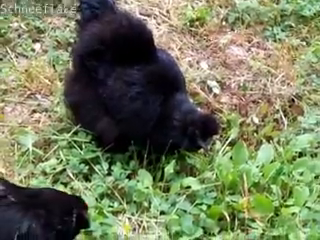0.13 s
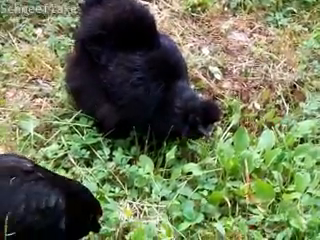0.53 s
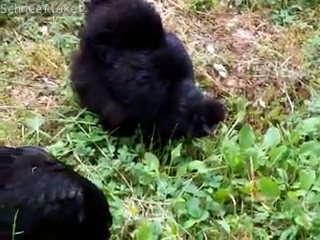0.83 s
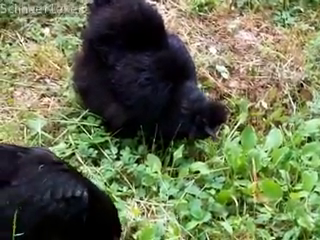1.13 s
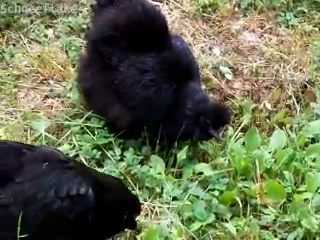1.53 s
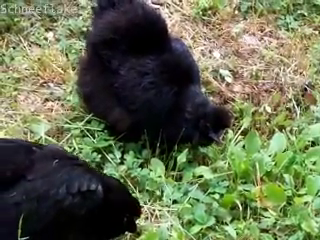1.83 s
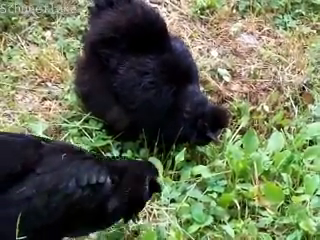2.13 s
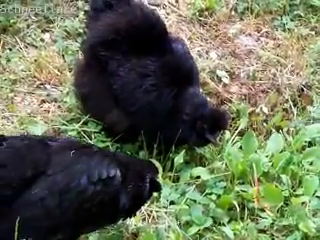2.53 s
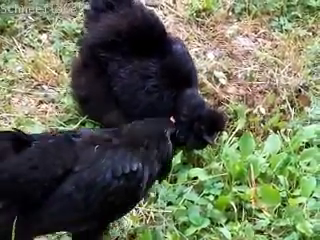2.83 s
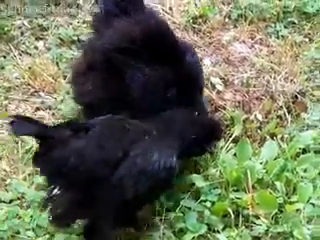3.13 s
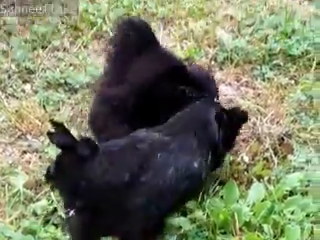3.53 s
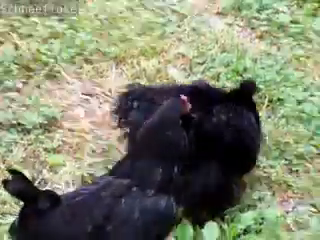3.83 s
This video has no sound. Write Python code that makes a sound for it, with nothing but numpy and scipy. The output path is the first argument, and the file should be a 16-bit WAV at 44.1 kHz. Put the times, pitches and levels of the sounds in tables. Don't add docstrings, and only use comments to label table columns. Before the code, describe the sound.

Hens on grass: short soft closed-beak notes, a small grumble, a soft coo, then a rattling growl breaking into a raspy scream and fluttering tail. Faint ticks and rustling follow over a dull outdoor wash, small mono pickup.

```python
import sys
import numpy as np
from scipy import signal
from scipy.fft import rfft, irfft
from scipy.io import wavfile
from scipy.ndimage import uniform_filter1d

SR = 44100
rng = np.random.default_rng(int(sys.argv[2]) if len(sys.argv) > 2 else 0)


def how_loud(loudness_db):
    steps = np.asarray(loudness_db, float) / 20
    return 10 ** steps


def dump_mix(stems):
    frames = np.atleast_2d(stems).T
    limited = np.clip(frames, -1, 1)
    pcm = np.round(limited * 32767).astype(np.int16)
    wavfile.write(sys.argv[1], SR, pcm)


N = 176400

# frequency in Hz, density in dB per Hz.
YARD_COLOUR = [(20, -16.5), (100, -5.5), (300, -4), (805, -0.5), (2730, -18.5), (3900, -28), (7800, -23.5)]

# start in seconds, length in seconds, level in dB, pitch in Hz.
MURMURS = [(-.02, 0.066, -47.5, 274), (0.092, 0.055, -53, 268), (0.157, 0.047, -54.5, 264.6),
           (0.197, 0.059, -53, 271), (0.338, 0.017, -40.5, 262), (0.373, 0.029, -42, 260.3),
           (0.538, 0.071, -58, 264.5), (.622, 0.036, -47.5, 268.3), (1.623, 0.025, -36, 272.7),
           (1.747, 0.066, -45.5, 264.4), (1.855, 0.081, -50, 264.3), (1.949, 0.072, -55.5, 256),
           (2.018, 0.082, -51.5, 273.8), (2.248, 0.098, -51, 280.5), (2.347, 0.082, -52, 272.3),
           (2.429, .17, -54.5, 277.5)]
# multiple of the pitch, level in dB.
MURMUR_PARTIALS = [(1, -7), (2, -8.5), (3, 0.5), (4, -13.5), (5, -24)]
# time in seconds, pitch in Hz, level in dB.
COO = [
    (2.652, 365, -47),
    (2.672, 284, -44),
    (2.725, 275, -49),
]
# multiple of the pitch, level in dB.
COO_PARTIALS = [(1, -11), (2, -17.5), (3, -21)]

# time in seconds, peak in dB, low part in dB.
STEM_TICKS = [(0.149, -57.5, 18), (0.398, -44, -0.5), (1.0008, -48.5, -5.5), (1.1808, -51.5, 9),
              (1.5593, -52, 4), (1.9064, -48, -12), (3.1018, -58, 26.5), (3.666, -55, -6),
              (3.696, -48.5, -0.5), (3.9307, -53, 4), (3.962, -52, 8)]
# time of the peak in seconds, level in dB, ring in Hz.
BEAK_TAPS = [(.15, -49, 1015), (0.149, -52.5, 2090), (.367, -50, 890), (3.101, -63, 1800),
             (3.119, -52, 1470), (0.453, -51, 1000), (0.453, -57.5, 2000), (3.118, -49, 2090),
             (3.127, -46.5, 369), (3.86, -46.5, 843), (3.874, -55, 412), (3.954, -46, 1220)]
# middle in seconds, length in seconds, level in dB.
RUSTLES = [
    (3.166, 0.34, -56.5),
    (3.662, 0.52, -64),
    (3.833, 0.11, -61),
    (3.969, 0.13, -50),
]
# frequency in Hz, density in dB per Hz.
LEAF_COLOUR = [(300, -12.5), (1170, -4.5), (3400, -22), (7800, -16)]

# time in seconds, pitch in Hz, level in dB.
SPRAY = [(1.799, 1900, -68.5), (1.895, 1858, -74.5)]
# time in seconds, pitch in Hz, level in dB.
GRUMBLE_HIGH = [(1.815, 891, -45), (1.86, 912, -47.5), (1.888, 878, -46.5), (1.905, 880, -59)]
# time in seconds, pitch in Hz, level in dB.
GRUMBLE_LOW = [(1.815, 712, -45.5), (1.829, 763, -54), (1.915, 719, -59)]
# time in seconds, pitch in Hz, level in dB.
GRUMBLE_TOP = [(1.815, 1110, -54.5), (1.895, 1060, -59)]
# time in seconds, pitch in Hz, level in dB.
ROLL = [
    (2.733, 941, -47.5),
    (2.83, 952, -40.5),
    (2.915, 940, -46.5),
]
# time in seconds, pitch in Hz, level in dB.
ROLL_TOP = [(2.741, 1994, -69.5), (2.85, 1905, -64.5), (2.905, 1810, -61)]
# time in seconds, pitch in Hz, level in dB.
GROWL_HIGH = [(2.915, 937, -41), (3.02, 890, -41.5), (3.05, 944, -39), (3.18, 945, -41.5)]
# time in seconds, pitch in Hz, level in dB.
GROWL_LOW = [(2.912, 775.5, -39.5), (2.958, 688.6, -43.5), (3.086, 768.5, -40), (3.16, 737, -42.5),
             (3.218, 765, -35.5)]
# time in seconds, pitch in Hz, level in dB.
GROWL_UNDER = [(2.93, 470, -64), (3.169, 430, -60)]
# time in seconds, pitch in Hz, level in dB.
SCREAM = [(3.178, 973, -41), (3.198, 986.6, -20.5), (3.207, 983, -50), (3.22, 1045, -22),
          (3.229, 1165, -31.5), (3.243, 1146, -32), (3.27, 1135, -33), (3.284, 1049, -26),
          (3.305, 912, -33)]
# time in seconds, pitch in Hz, level in dB.
SCREAM_SHRIEK = [(3.185, 1520, -34), (3.194, 1650, -28), (3.198, 2236, -37.5), (3.209, 2910, -35)]
# time in seconds, pitch in Hz, level in dB.
RASP_LOW = [(3.288, 779, -29), (3.305, 770, -26), (3.32, 751, -30.5), (3.338, 774, -26.5), (3.35, 755, -46)]
# time in seconds, pitch in Hz, level in dB.
RASP_MID = [(3.308, 1142, -41), (3.321, 1260, -28), (3.335, 1240, -36)]
# time in seconds, pitch in Hz, level in dB.
RASP_HIGH = [(3.286, 1487, -36.5), (3.291, 1650, -29), (3.346, 1562, -33)]
# time in seconds, pitch in Hz, level in dB.
RASP_RING = [(3.283, 3337, -54), (3.305, 3643, -50), (3.345, 3475, -62)]
# time in seconds, pitch in Hz, level in dB.
RASP_HISS = [(3.278, 5220, -63.5), (3.308, 4900, -61.5), (3.345, 5030, -58)]
# time in seconds, pitch in Hz, level in dB.
CRY_HIGH = [(3.316, 1121, -50), (3.348, 1384, -27), (3.357, 1325, -44.5), (3.372, 1351, -25.5),
            (3.4, 1200, -47)]
# time in seconds, pitch in Hz, level in dB.
CRY_LOW = [(3.36, 1070, -28), (3.372, 1067, -47), (3.381, 986, -21), (3.401, 910, -60.5)]
# time in seconds, pitch in Hz, level in dB.
CRY_END = [(3.386, 827, -46), (3.398, 740, -37.5), (3.406, 750, -60)]
# time in seconds, pitch in Hz, level in dB.
TAIL_HIGH = [(3.405, 1252, -38), (3.443, 1278, -47), (3.485, 1366, -29.5)]
# time in seconds, pitch in Hz, level in dB.
TAIL_MID = [(3.419, 1003, -42.5), (3.448, 1041, -36.5), (3.476, 1032, -56), (3.494, 1021, -32.5),
            (3.519, 1090, -48.5), (3.565, 1030, -49)]
# time in seconds, pitch in Hz, level in dB.
TAIL_LOW = [(3.482, 799, -44), (3.494, 804, -40.5), (3.618, 791, -48)]
# time in seconds, pitch in Hz, level in dB.
TAIL_TOP = [(3.39, 2076, -55), (3.431, 1874, -62), (3.528, 1778, -72)]
# time in seconds, pitch in Hz, level in dB.
TAIL_UNDER = [(3.53, 542, -59), (3.616, 482, -51)]
# time in seconds, pitch in Hz, level in dB.
BEAK_RING = [(3.41, 3780, -78), (3.5, 3730, -65), (3.54, 3540, -85)]
# frequency in Hz, gain in dB.
THROAT = [(1500, -24), (1900, -20.5), (2280, 0.5), (2650, -49), (3450, -14), (3800, -33), (4600, -20),
          (5500, -27.5)]
# middle in seconds, size in dB.
GRUMBLE_THROBS = [(1.824, -4.5), (1.838, 2.5), (1.854, -5), (1.867, -7), (1.877, -8), (1.889, 2),
                  (1.902, -6), (1.915, -8)]
# middle in seconds, size in
# dB.
LONG_CALL_THROBS = [(2.740, 1), (2.754, -2), (2.771, -2), (2.782, 7.5), (2.797, -1), (2.815, -2.5),
                    (2.828, 1.5), (2.845, 1.5), (2.859, 4.5), (2.875, -0.5), (2.890, 1.5), (2.906, 6.5),
                    (2.922, 1.5), (2.94, 1), (2.959, -4.5), (2.973, 0.5), (2.986, 0), (3.008, -0.5),
                    (3.024, -5.5), (3.039, -2), (3.052, -4), (3.067, -1.5), (3.081, -2.5), (3.098, -1),
                    (3.115, 4.5), (3.128, 0.5), (3.147, 2.5), (3.164, 3), (3.178, 2.5),
                    (3.197, -1.5), (3.219, 1), (3.239, 1), (3.256, 0.5), (3.268, 4), (3.285, 1.5),
                 (3.304, 0.5), (3.320, -2), (3.337, 0), (3.349, -1), (3.369, 0), (3.385, -2.5),
                 (3.398, -4.5), (3.414, 1.5), (3.43, 4.5), (3.445, 2), (3.461, 3), (3.476, -9.5),
                 (3.491, 3.5), (3.505, -1), (3.526, 2.5), (3.542, 1.5), (3.559, -6), (3.581, 3.5),
                 (3.593, 0), (3.606, -4.5), (3.622, 1)]
# time in seconds, level in dB.
TORN_AIR = [(2.73, -60.5), (3.173, -59), (3.195, -30), (3.212, -37), (3.278, -46.5), (3.297, -31.5),
            (3.341, -35), (3.4, -45), (3.623, -63.5)]
# frequency in Hz, density in dB per Hz.
TORN_AIR_COLOUR = [(300, -43), (560, -36.5), (900, 6), (1700, -1.5), (2700, -19.5), (3600, -19),
                   (5000, -27), (7700, -28.5)]

# delay in seconds, level in dB.
ECHOES = [(.003, -24.5), (.011, -14), (.028, -25)]
# frequency in Hz, gain in dB.
MIRROR = [(8200, -1.5), (9500, -6), (11000, -13), (12500, -20.5), (14000, -33), (15200, -47.5),
          (15700, -65)]


def evened(x):
    return x / np.sqrt(np.mean(x ** 2) + 1e-20)


def read(points, hz):
    f, value = np.transpose(points)
    return np.interp(np.log(hz + 1), np.log(f + 1), value)


def add(mix, s, sound):
    at = round(s * SR)
    part = mix[max(at, 0):][:len(sound) + min(at, 0)]
    part += sound[max(-at, 0):][:len(part)]


def coloured(x, gain_db):
    return irfft(rfft(x) * how_loud(gain_db(np.fft.rfftfreq(len(x), 1 / SR))), len(x))


def wander(count, rate_hz):
    smooth = signal.butter(4, rate_hz, fs=SR, output="sos")
    drift = evened(signal.sosfilt(smooth, rng.standard_normal(SR)))
    return drift[2000:2000 + count]


def yard():
    frames, hz = N // 128 + 5, np.fft.rfftfreq(512, 1 / SR)
    real, imag, patches = rng.standard_normal((frames, 257, 3)).T
    patches = uniform_filter1d(patches, size=6, axis=0)
    patches = evened(uniform_filter1d(patches, size=20, axis=1))
    flicker = evened(uniform_filter1d(rng.standard_normal(frames), size=4))
    flicker = flicker * np.clip(hz / 5000, .3, 1)[:, None]
    spectrum = (real + 1j * imag) * how_loud(1.57 * patches + 0.4 * flicker)
    wash = signal.istft(spectrum, nperseg=512, noverlap=384)[1][:N]
    return how_loud(-60) * evened(coloured(wash, lambda hz: read(YARD_COLOUR, hz) - 60 * (hz > 8000)))


def stack(hz, partials, rough):
    turns = np.cumsum(hz) / SR + 0.42 * rough * wander(len(hz), 45) + rng.random()
    voice = np.zeros(len(hz))
    for k, db in partials:
        shake = 1 + rough * k ** 0.27 * wander(len(hz), 65 + 0.068 * k * hz.mean())
        voice += how_loud(db) * np.sin(2 * np.pi * k * turns) * shake
    return np.sqrt(2) * voice


def note(length, level_db, pitch_hz):
    rise_s, fall_s, fade_db, sag, rough = 0.015, 0.016, -2.5, 0.032, 0.072
    t = np.arange(0, length, 1 / SR)
    shape = np.clip(np.minimum(t / rise_s, (length - t) / fall_s), 0, 1)
    level = how_loud(level_db - 1.5 + fade_db * t / length)
    return shape * level * stack(pitch_hz * (1 - sag * t / length), MURMUR_PARTIALS, rough)


def murmurer():
    out = np.zeros(N)
    for start, length, level_db, pitch_hz in MURMURS:
        add(out, start, note(length, level_db, pitch_hz))
    add(out, *side(COO, 0.072, 0, 0, 0, COO_PARTIALS))
    return out


def leaves():
    out, t = np.zeros(N), np.arange(1024) / SR
    for s, db, low_db in STEM_TICKS:
        snap = rng.standard_normal(1024) * np.exp(-t / 0.00097)

        def tick_colour(hz):
            return np.where(hz < 3500, low_db - 5 - 12 * (hz < 1000), -8. * (hz < 5500))
        add(out, s, how_loud(db + 1.5) * coloured(snap, tick_colour))
    for s, db, hz in BEAK_TAPS:
        peak_s = 3 / hz
        swell = (t / peak_s) * np.exp(1 - t / peak_s)
        add(out, s - peak_s, how_loud(db) * np.sin(2 * np.pi * hz * t) * swell)
    crackles = how_loud(2.6 * np.minimum(rng.exponential(1, N), 4)) * (rng.random(N) < 2500 / SR)
    grains = rng.standard_normal(N) * (0.2 + crackles)
    grains = evened(coloured(grains, lambda hz: read(LEAF_COLOUR, hz)))
    clock = np.arange(N) / SR
    brush = sum(how_loud(db) * np.exp(-8 * ((clock - s) / length) ** 2) for s, length, db in RUSTLES)
    return out + grains * brush


def throb(t, depth):
    s, db = np.transpose(GRUMBLE_THROBS + LONG_CALL_THROBS)
    lean = 1.61
    turns = np.interp(t, s, np.arange(len(s))) + .5 ** (1 / lean)
    gate = np.sin(np.pi * (turns % 1) ** lean) ** 2
    gain = (1 - depth + 1.56 * depth * gate ** 0.69) * how_loud(gate * db[turns.astype(int)])
    return gain, turns % 1


def side(curve, rough, lag_s, depth, tilt_db, partials=None):
    s, hz, db = np.transpose(curve)
    t = np.arange(s[0], s[-1], 1 / SR)
    gain, progress = throb(t - lag_s, depth)
    ends = np.clip(np.minimum(t - s[0], s[-1] - t) / 0.003, 0, 1)
    hz = np.interp(t, s, hz) * (1 + 0.078 * depth * (.5 - progress))
    if partials is None:
        overtones = [(k, read(THROAT, k * hz) + tilt_db * (k - 1)) for k in range(2, 6)]
        partials = [(0.99, 0.021)] + overtones
    return s[0], ends * gain * how_loud(np.interp(t, s, db)) * stack(hz, partials, rough)


def torn_air():
    s, db = np.transpose(TORN_AIR)
    t = np.arange(s[0], s[-1], 1 / SR)
    air = evened(coloured(rng.standard_normal(SR), lambda hz: read(TORN_AIR_COLOUR, hz)))
    return s[0], air[:len(t)] * how_loud(np.interp(t, s, db)) * throb(t, 0.3)[0]


def squawker():
    out = np.zeros(N)
    # curves, roughness, throb lag in seconds, throb depth, tilt in dB per overtone.
    voices = [
        ((GRUMBLE_HIGH,), .4, 0, .8, -6),
        ((GRUMBLE_LOW, GRUMBLE_TOP), .45, 0, .8, -30),
        ((ROLL,), .3, 0, .9, -16),
        ((GROWL_HIGH, GROWL_LOW), .28, 0, .7, -25),
        ((SCREAM,), .13, 0, .25, -2.5),
        ((RASP_LOW, SCREAM_SHRIEK, RASP_MID, RASP_HIGH), .35, 0, .45, -5),
        ((CRY_HIGH, CRY_LOW, CRY_END), .2, 0, .15, -9),
        ((TAIL_HIGH, TAIL_MID), .3, 0, .97, -12),
        ((TAIL_LOW, TAIL_UNDER), .35, 0, .7, -14),
        ((BEAK_RING, TAIL_TOP, GROWL_UNDER, SPRAY), 1.6, .006, .8, -30),
        ((ROLL_TOP,), .7, .005, .85, -35),
        ((RASP_RING, RASP_HISS), 1.5, 0, .5, -40)]
    for curves, rough, lag_s, depth, tilt_db in voices:
        for curve in curves:
            add(out, *side(curve, rough, lag_s, depth, tilt_db))
    add(out, *torn_air())
    return out


def scene():
    hens = squawker() + murmurer()
    near = hens.copy()
    for delay, db in ECHOES:
        add(near, delay, how_loud(db) * hens)
    return (near + leaves() + yard())[None]


def roll_off(x):
    return signal.sosfilt(signal.butter(12, 15640, fs=SR, output="sos"), x)


def record(dry):
    low_rate_hz = 16000

    def pickup_colour(hz):
        port_dip = -9 * np.exp(-((hz - 4220) / 520) ** 2)
        return -70 * (hz > low_rate_hz / 2 - 268) - 40 * (hz < 15) + port_dip
    low = coloured(dry[0], pickup_colour)
    image = 2 * low * np.cos(2 * np.pi * low_rate_hz * np.arange(N) / SR)
    image = coloured(image, lambda hz: read(MIRROR, hz) - 80 * (hz > low_rate_hz - 250))
    running = np.arange(N) < 3.995 * SR
    return roll_off(((low + image) * running)[None])


dry = scene()
out = record(dry)
dump_mix(out)
```